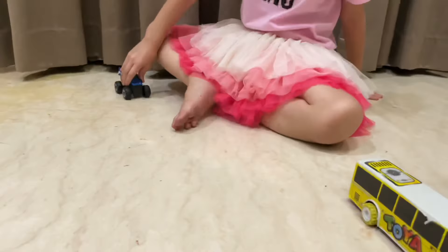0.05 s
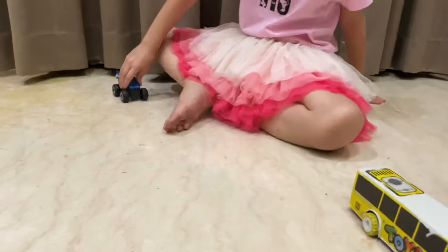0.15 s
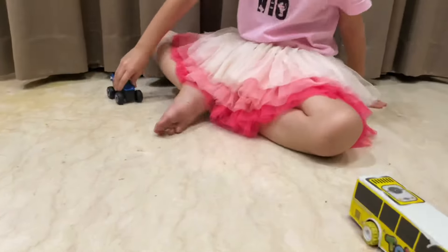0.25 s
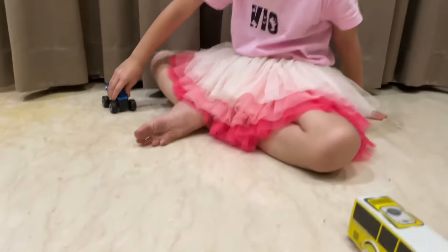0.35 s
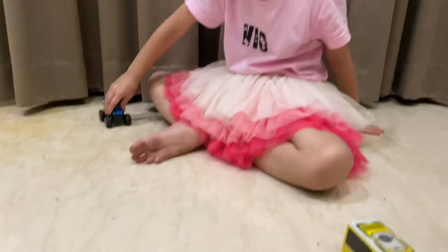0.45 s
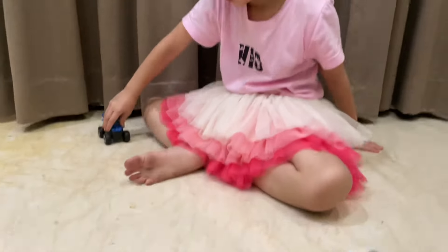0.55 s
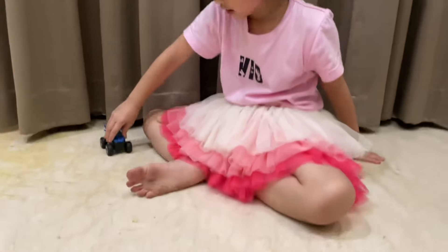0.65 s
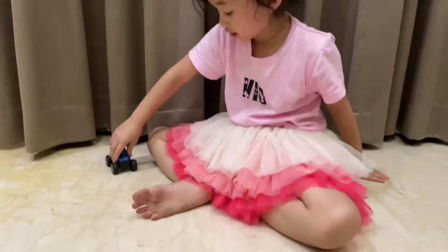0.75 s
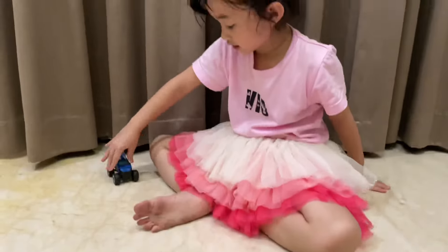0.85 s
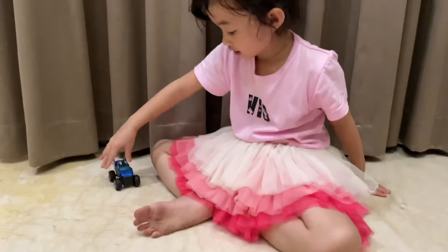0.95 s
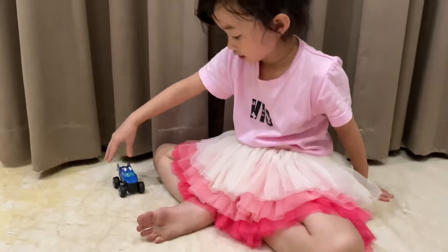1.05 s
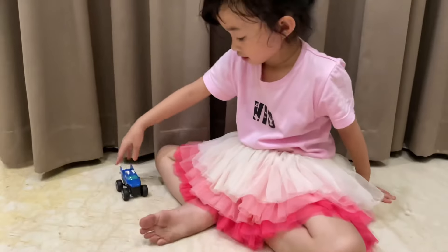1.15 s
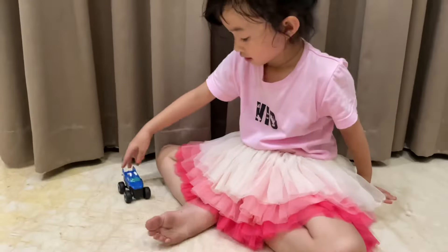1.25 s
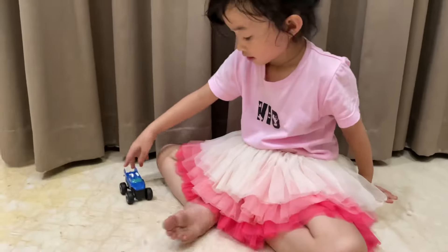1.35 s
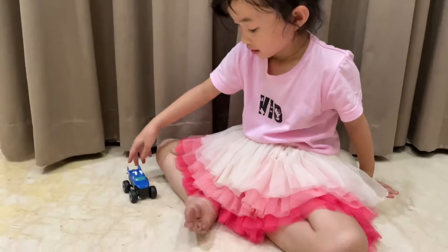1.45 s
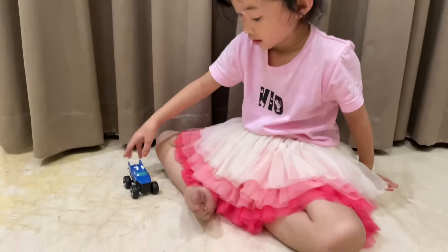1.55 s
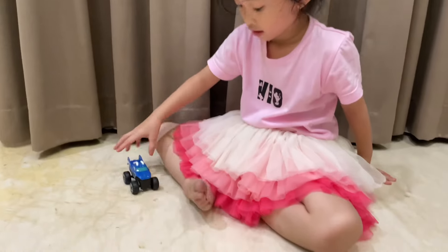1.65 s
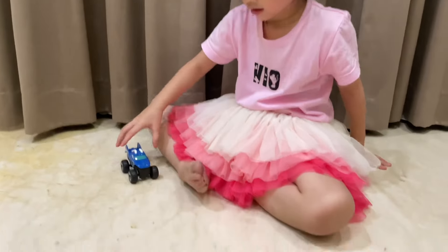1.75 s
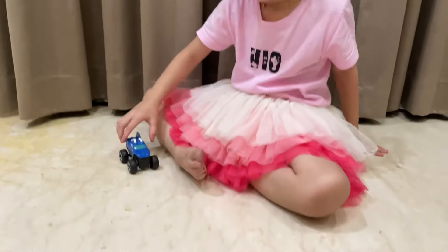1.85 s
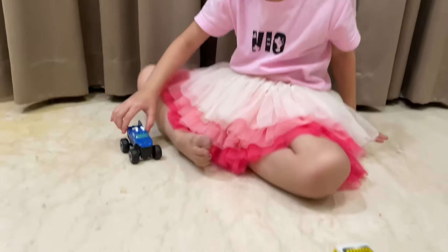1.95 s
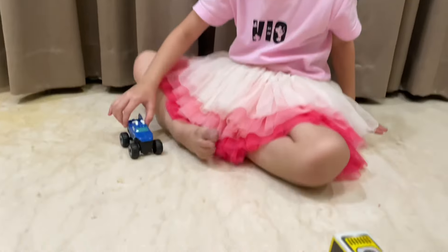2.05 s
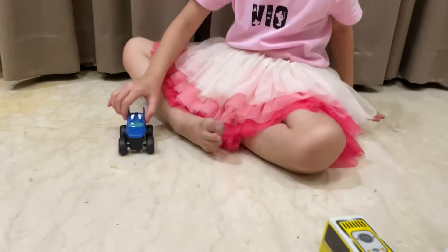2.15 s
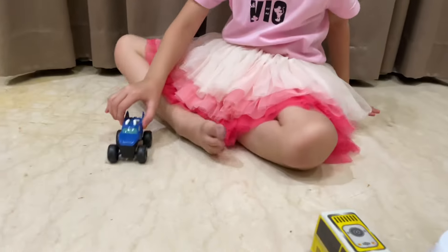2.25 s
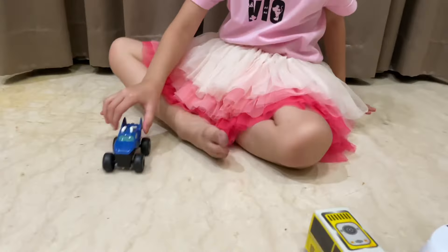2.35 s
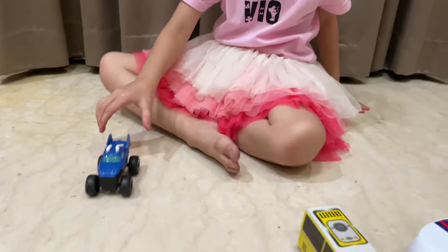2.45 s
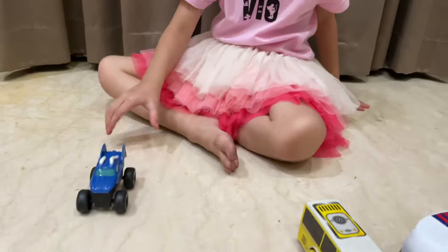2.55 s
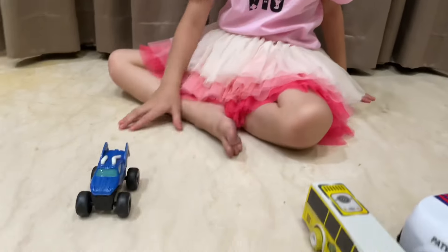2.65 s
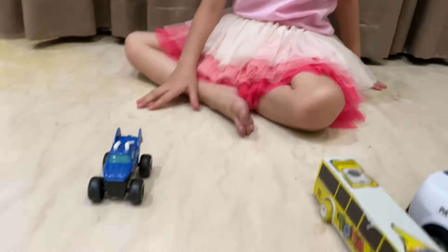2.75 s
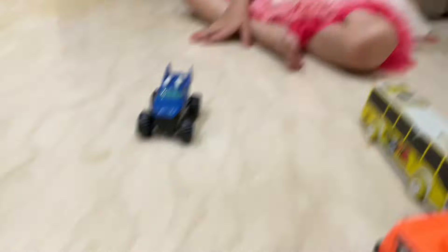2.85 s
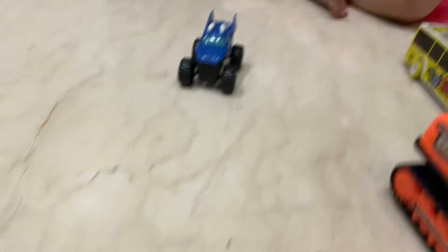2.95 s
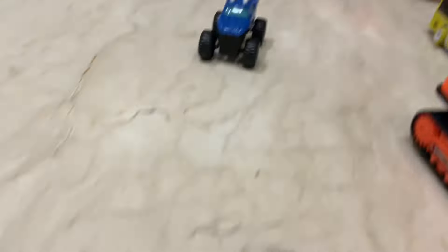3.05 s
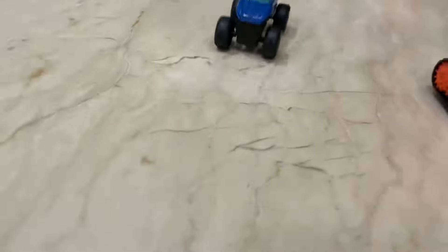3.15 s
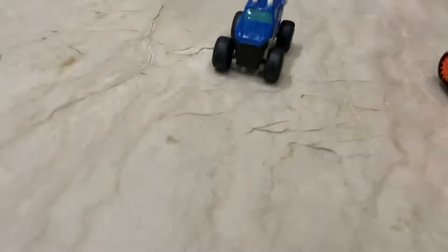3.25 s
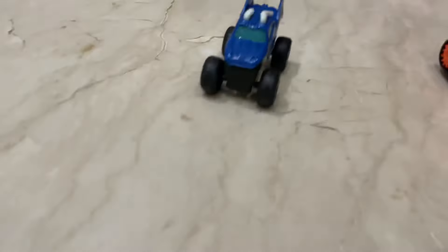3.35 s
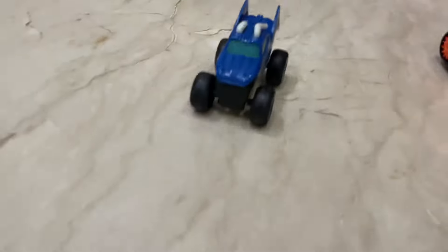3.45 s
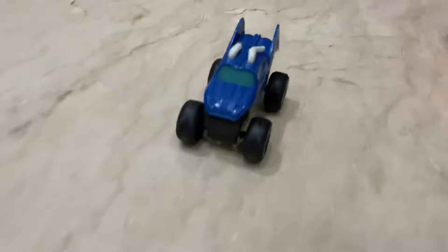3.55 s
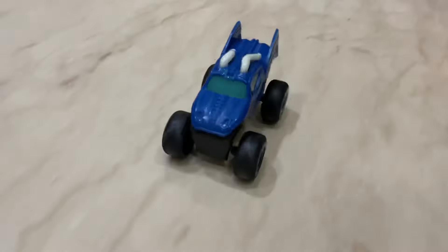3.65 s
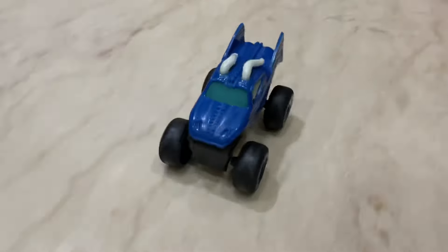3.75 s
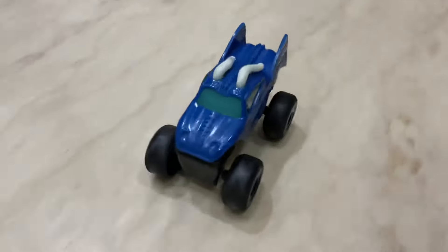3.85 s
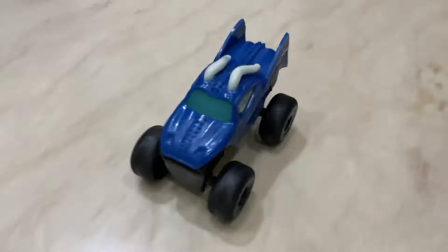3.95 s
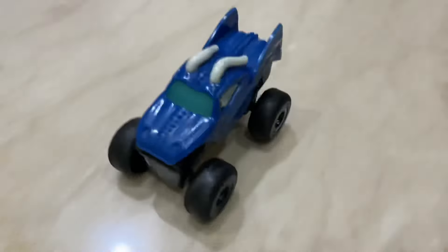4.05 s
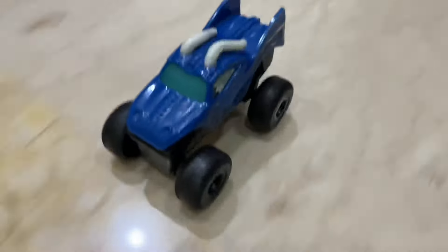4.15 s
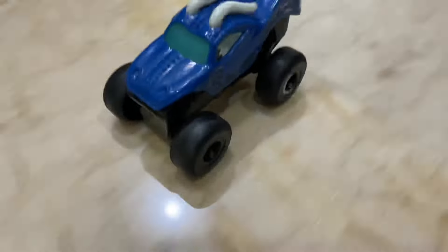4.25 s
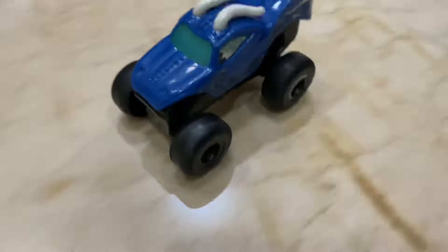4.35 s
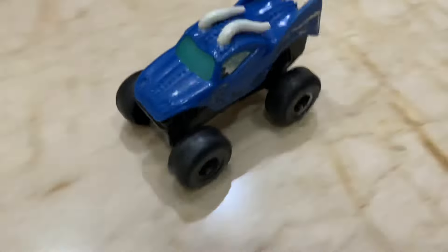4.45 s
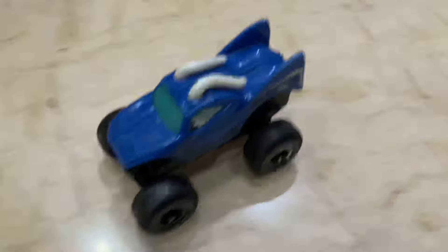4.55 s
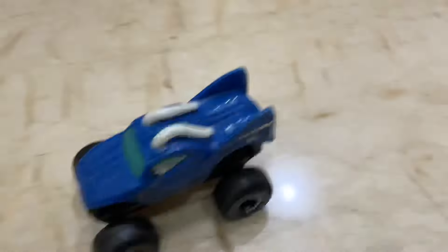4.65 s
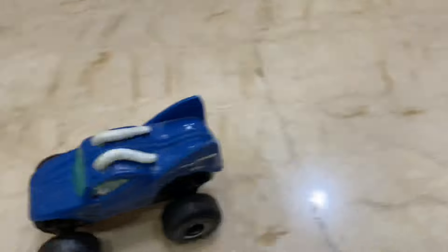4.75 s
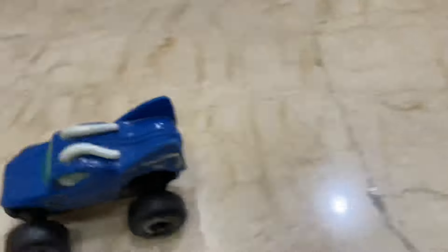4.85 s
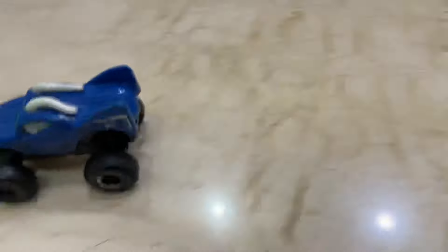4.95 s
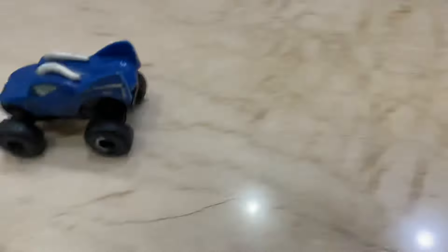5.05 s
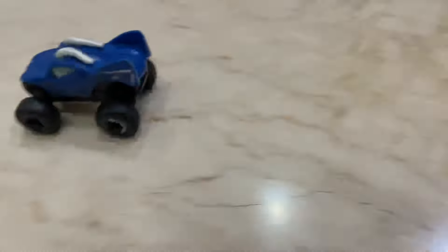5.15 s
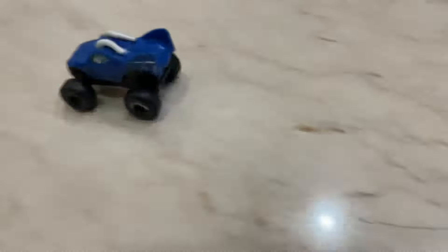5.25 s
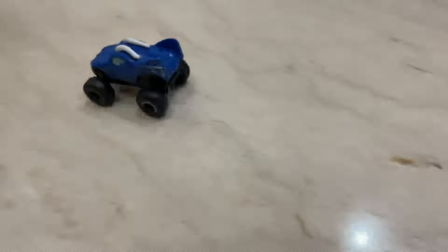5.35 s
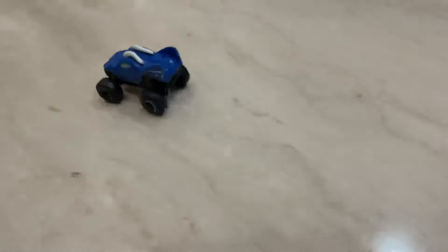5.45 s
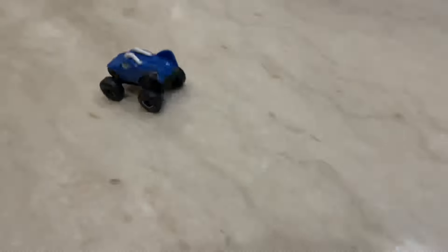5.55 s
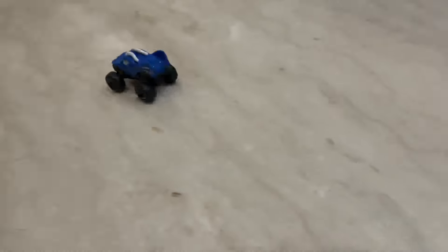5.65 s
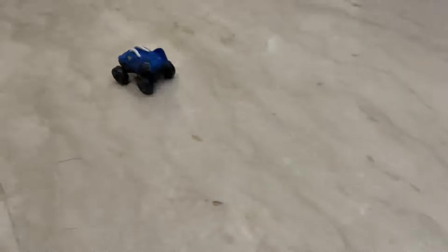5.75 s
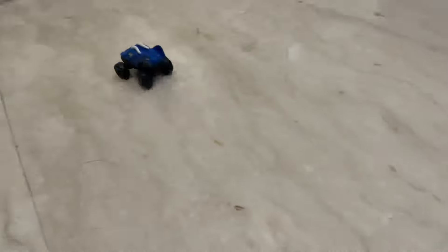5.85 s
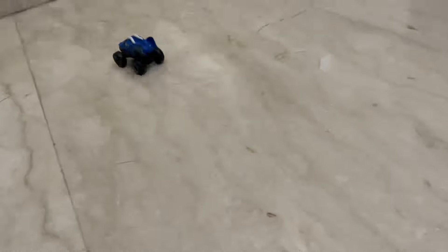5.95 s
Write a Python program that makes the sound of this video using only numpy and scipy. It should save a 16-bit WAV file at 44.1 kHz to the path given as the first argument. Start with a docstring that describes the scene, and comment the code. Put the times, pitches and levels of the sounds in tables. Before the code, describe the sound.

A plastic toy truck is nudged in short ratcheting clicks, something knocks once, then its gears whir and rattle loudly across a stone floor.

```python
"""A plastic toy truck with a gear motor is shoved by hand in short clicking bursts on an indoor stone floor.
Something farther off knocks once, with quick rebounds; then the truck is eased forward and let go.
Gear teeth rattle its hollow shell, blows ring its steel axle, and loose parts chatter as the tyres roll.
An appliance hums throughout over low room air. Noise pulses drive resonances; a stereo pair hears it
with a time lead that follows the truck, among changing reflections."""
import sys
import numpy as np
from scipy import signal
from scipy.fft import rfft, irfft
from scipy.io import wavfile
from scipy.ndimage import uniform_filter1d, minimum_filter1d

SR = 44100
rng = np.random.default_rng(int(sys.argv[2]) if len(sys.argv) > 2 else 0)


def pcm_store(signal):
    """Save signal as 16-bit PCM."""
    levels = np.round(np.clip(np.atleast_2d(signal), -1, 1) * 32767)
    wavfile.write(sys.argv[1], SR, levels.astype(np.int16).T)


N = 265041
TIME = np.arange(N) / SR
HZ = np.fft.rfftfreq(N, 1 / SR)

# the hardest blows on the shell: start_s, relative_db
SHELL_BLOWS = [(1.924, -9), (2.136, -8), (2.1455, -6), (2.829, -6), (3.0094, -4), (3.0217, -6), (3.044, -4),
               (3.1518, -5), (3.2066, -6), (3.261, -3), (3.284, -4), (3.292, -2), (3.3238, -5),
               (3.4359, -5), (3.456, -2), (3.5843, -6), (3.692, -5), (3.7071, -6), (3.8406, -5),
               (3.8605, -6), (3.9003, -5), (3.9194, -4), (4.0352, -4), (4.0685, -5), (4.1041, -2),
               (4.1486, -5), (4.2308, -4), (4.2647, -5), (4.3126, -5), (4.3306, -4), (4.3451, -4),
               (4.3829, -5), (4.4812, -2), (4.5143, -4), (4.5795, -4), (4.7858, -5), (4.8111, -6),
               (4.8596, -6), (5.1998, -6), (5.3772, -3), (5.425, -4), (5.5821, -6), (5.603, -4),
               (5.6544, -5), (5.8338, -7), (5.8756, -7), (5.9534, -7)]
# the hardest blows on the axle: start_s, relative_db
AXLE_BLOWS = [(1.8532, -20), (2.1244, -19), (2.2598, -14), (2.379, -12), (2.4374, -8), (2.4562, -10),
              (2.4865, -9), (2.5034, -7), (2.6115, -14), (2.6564, -9), (2.6999, -12), (2.7164, -11),
              (2.7307, -11), (2.774, -10), (2.7931, -11), (3.099, -13), (3.1833, -13), (3.2755, -11),
              (3.3086, -9), (3.3273, -10), (3.3503, -6), (3.3606, -6), (3.3755, -8), (3.3947, -6),
              (3.5333, -7), (3.5802, -11), (3.5924, -9), (3.6006, -6), (3.6536, -11), (3.7775, -11),
              (3.791, -10), (4.0913, -8), (4.1141, -10), (4.1356, -11), (4.7316, -15), (4.7711, -13),
              (4.8284, -7), (4.8466, -10), (4.8747, -10), (4.8968, -7), (4.9081, -10), (4.9632, -8),
              (5.1514, -13), (5.3531, -12), (5.8671, -9)]
# the sharpest plastic ticks: start_s, relative_db
PLASTIC_TICKS = [(0.012, -24), (0.028, -21), (0.268, -25), (2.1253, -15), (2.2158, -14), (2.2497, -12),
                 (2.3777, -15), (2.715, -13), (3.099, -16), (3.1823, -15), (3.2906, -15), (3.4387, -13),
                 (3.5694, -14), (3.8553, -13), (3.9306, -12), (3.964, -14), (4.0454, -12), (4.0696, -13),
                 (4.189, -12), (4.3113, -15), (4.3408, -13), (4.4115, -14), (4.4866, -12), (4.5521, -13),
                 (4.628, -12), (4.658, -12), (4.6875, -12), (4.7283, -13), (4.7435, -12), (4.7692, -12),
                 (5.3264, -13), (5.4157, -9), (5.4361, -9), (5.6537, -14), (5.751, -10), (5.9597, -13)]
# spectrum of a small plastic tick: frequency_hz, relative_db
TICK_SPECTRUM = [(300, -36), (2000, 7), (4000, 22), (5200, 12), (6500, 16), (8300, 2.5), (10700, 8),
                 (11800, 4), (13000, 5.5), (15500, -39)]


def amp(db):
    """Decibels to gain."""
    return 10 ** (np.asarray(db) / 20)


def unit(x):
    """Scales to an rms of one."""
    return x / np.sqrt(np.mean(x ** 2) + 1e-20)


def read(points, hz):
    """A spectrum joined by straight lines over log frequency."""
    f, value = np.transpose(points)
    return np.interp(np.log(hz + 1), np.log(f + 1), value)


def curve(rows, axis=1):
    """One column of a table at every sample."""
    rows = np.array(rows)
    return np.interp(TIME, rows[:, 0], rows[:, axis])


def level(rows):
    """Gain from a dB curve, with a short fade in where it starts."""
    started = 1. * (TIME >= rows[0][0])
    return uniform_filter1d(started, size=500) * amp(curve(rows))


def wander(rate_hz):
    """Smooth random drift of unit rms, mostly slower than the given rate."""
    noise = rfft(rng.standard_normal(N))
    return unit(irfft(noise / (1 + (HZ / rate_hz) ** 4), N))


def steadied(x, size=4000):
    """Holds the running rms near one and keeps the quick detail."""
    power = uniform_filter1d(uniform_filter1d(x ** 2, size), size)
    return x / np.sqrt(power.clip(0) + 1e-12)


def impacts(per_s, spread_db):
    """Random impulses of uneven size and sign."""
    size = amp(spread_db * np.clip(rng.standard_normal(N), -2, 2))
    return (rng.random(N) < per_s / SR) * size * rng.choice([-1, 1], N)


def blows(rows):
    """One impulse for each row (start_s, relative_db)."""
    s, db = np.transpose(rows)
    at = np.clip(np.round(s * SR).astype(int), 0, N - 1)
    return np.bincount(at, amp(db), N)


def strike(force, response):
    """A body's answer to a train of blows."""
    return signal.oaconvolve(force, response)[:N]


def bursts(rows, decay_s):
    """Each touch (start_s, relative_db) is a short, dying burst of noise."""
    fade = np.exp(-TIME[:SR // 50] / decay_s)
    return strike(blows(rows), fade / np.linalg.norm(fade)) * rng.standard_normal(N)


def snap(points, modes=(), size=2048):
    """A causal click of unit energy with the given spectrum, raised at its resonances."""
    hz = abs(np.fft.fftfreq(size, 1 / SR))
    peaks = 1 + sum(amp(db) ** 2 / (1 + (2 * (hz - centre) / width) ** 2) for centre, width, db in modes)
    log_gain = np.log(amp(read(points, hz)) * np.sqrt(peaks))
    # minimum phase puts the energy as early as the spectrum allows
    click = np.fft.ifft(np.exp(np.conj(signal.hilbert(log_gain)))).real
    return click / np.linalg.norm(click)


def ring(modes, size=2048):
    """Dying sines of unit energy in all; a wider resonance dies sooner."""
    t = TIME[:size]
    tone = sum(amp(db) * width * np.exp(-np.pi * width * t) * np.sin(2 * np.pi * hz * t)
               for hz, width, db in modes)
    return tone / np.linalg.norm(tone)


def dispersed(click, spread_s=0.002075, size=4096):
    """Bending waves cross the plastic faster in the treble, so a blow smears into a short chirp."""
    hz = np.fft.rfftfreq(size, 1 / SR)
    delay_s = spread_s / (1 + hz / 3000)
    phase = 2 * np.pi * np.cumsum(delay_s) * hz[1]
    return irfft(rfft(click, size) * np.exp(-1j * phase), size)


def bend(x, shift_hz):
    """Shifts all the frequencies of a sound up or down along a curve."""
    return (signal.hilbert(x) * np.exp(2j * np.pi * np.cumsum(shift_hz) / SR)).real


def background(hum_db=-2.5, beat_s=0.3, beat_at_s=0.23, air_db=-37):
    """An appliance hums, beats and changes in level, over the low rush of the room."""
    # main hum: start_s, relative_db
    hum_level = [(0, -31), (2.4, -32), (3.05, -34), (3.2, -46), (4.4, -48), (5.2, -39), (5.8, -32)]
    # higher lines: frequency_hz, level_db against the top of the hum_level table
    overtone_lines = [(98.5, -12), (145.3, -15.5), (199.5, -17)]
    # room air: frequency_hz, relative_db
    air_spectrum = [(20, -13), (32, -12), (45, -20), (62, 12.5), (85, 5), (130, 3.5), (250, -4), (450, -6),
                    (800, -15.5), (2000, -19.5), (5000, -33), (15500, -42)]
    hum_hz, waver_db = 48.3, 1.5

    def tone(hz):
        phase_waver = .5 * wander(5) * hz / 100  # radians
        return np.sqrt(2) * np.sin(2 * np.pi * (hz * TIME + rng.random()) + phase_waver)

    here_db = curve(hum_level)
    top_db = here_db.max()
    beat = 1 + .5 * np.cos(2 * np.pi * (TIME - beat_at_s) / beat_s)
    drone = amp(hum_db + here_db + waver_db * wander(3.8)) * beat * tone(hum_hz)
    # the higher lines and the air follow the hum's level changes only in part
    spot = amp(.3 * (here_db - top_db))
    overtones = spot * sum(amp(top_db + db) * tone(hz) for hz, db in overtone_lines)
    common, apart = rfft(rng.standard_normal((2, N))) * amp(read(air_spectrum, HZ))
    apart = apart * HZ / (HZ + 110)  # the bass stays alike on both sides
    air = spot * unit(irfft(np.array([common + apart, common - apart]), N))
    return (drone + overtones + amp(air_db) * air) * amp([[-.8], [.8]])


def shoves():
    """Each shove by hand swells, lasts a moment and runs down."""
    # short shoves: start_s, relative_db, run_down_db_per_s
    shove_rows = [(-0.025, -22, 125), (0.235, -25, 125), (0.39, -41, 120)]
    rise_s, hold_s = .028, .06
    total = 0
    for s, db, fall in shove_rows:
        swell = np.clip((TIME - s) / rise_s, 0, 1) ** 1.5
        total = total + swell * amp(db - fall * np.maximum(TIME - s - hold_s, 0))
    return total


def drive(shove_db=0):
    """The loudness of the gears, as a gain, in the shoves and the long run."""
    # the long run, eased forward by hand and then let go: start_s, relative_db
    run_level = [(1.17, -45), (1.41, -42), (1.47, -33), (1.55, -42), (1.64, -43), (1.69, -33), (1.87, -29),
                 (1.98, -29.5), (2.15, -22), (2.18, -25), (2.23, -22), (2.29, -25), (2.46, -22),
                 (2.57, -28.5), (2.69, -23), (2.87, -22), (3.3, -21.5), (4.0, -18.5), (4.47, -17.5),
                 (4.7, -20), (5.08, -20), (5.23, -23.5), (5.39, -18.5), (5.93, -20), (6.01, -21)]
    return amp(shove_db) * shoves() + amp(3.5) * level(run_level)


def effort():
    """How hard the gears are driven, in dB against full speed."""
    full_db = -18.5
    # the shoves happen farther off, so they are harder than they sound
    driven = drive(shove_db=6)
    return np.maximum(20 * np.log10(driven + 1e-6) - full_db, -30)


def freedom():
    """The hand damps loose parts until the truck rolls away: 0 held, 1 rolling free."""
    held_s, free_s = 1.7, 3.5
    return np.clip((TIME - held_s) / (free_s - held_s), 0, 1)


def judder():
    """The chassis rocks in dying jolts; it hops before each hard landing, and the rattle lets up."""
    rock_hz, rock_jitter = 62, .4
    hop_s, hop_depth = .014, 2.0
    turns = np.cumsum(rock_hz * np.exp(rock_jitter * wander(rock_hz))) / SR
    jolts = unit(.5 - turns % 1)
    landings = blows([(s, 0) for s, _ in SHELL_BLOWS + AXLE_BLOWS + PLASTIC_TICKS])
    # run backwards, so that each hop leads up to its landing
    hop = strike(landings[::-1], signal.windows.tukey(round(hop_s * SR)))[::-1]
    rocking = .7 * (jolts + wander(rock_hz))
    return 1.5 * np.tanh(rocking - hop_depth * np.minimum(hop, 1))


def shell(shake, speed_up=.3, jitter=.45, uneven_db=3, rattle_db=-1.0, hand_db=-2, dulling=0.64):
    """Gear teeth hammer the plastic shell, faster and brighter the harder driven; a hand damps its ring."""
    # resonances: frequency_hz, width_hz, level_db against the broad spectrum
    shell_modes = [(1485, 71, 17.27), (1936, 190, 7.74), (2350, 110, 1.1)]
    # broad spectrum of a blow: frequency_hz, relative_db
    shell_spectrum = [(100, -67), (250, -14), (400, -19), (700, -10.5), (1100, -4.5), (1700, 0),
                      (2500, 4.5), (3100, 1), (3600, -10), (4800, 0), (6300, -9), (8300, -37), (10500, -18),
                      (12500, -21.5), (15500, -17)]
    # upper band, strongest while the nose points at the listener: start_s, change_db
    upper_band = [(.4, -6), (1.3, -10.5), (1.6, -7), (1.9, 3.5), (2.45, 4.5), (3.25, 5), (3.8, -2.5),
                  (4.8, 1), (5.4, -1), (6, 2.5)]
    upper_hz, upper_width_hz = 2790, 320
    teeth_hz = 195  # mean pace at full speed, before jitter
    stray_db, mesh_db, judder_db = -9, -19, 3.8  # stray knocks and mesh hiss, against the teeth
    clack_db, ping_shell_db = 11, 11.5
    rebound_db, rebound_s = 3, .007
    flex_hz, flex_rate_hz = 26, 22

    effort_db = effort()
    pace = teeth_hz * amp(speed_up * effort_db) * np.exp(jitter * wander(150))
    passed = np.floor(np.cumsum(pace) / SR)
    size = amp(uneven_db * rng.standard_normal(N).clip(-2, 2)) * rng.choice([-1, 1], N)
    teeth = np.diff(passed, prepend=0) * size
    stray = unit(impacts(per_s=900, spread_db=1.5))
    force = steadied(teeth) + amp(stray_db) * stray + amp(mesh_db) * rng.standard_normal(N)
    force = force * amp(judder_db * shake)

    free = dispersed(snap(shell_spectrum, shell_modes))
    damped_modes = [(hz, width, db + hand_db) for hz, width, db in shell_modes]
    held = dispersed(snap(shell_spectrum, damped_modes))
    rattle = strike(force * freedom(), free) + strike(force * (1 - freedom()), held)
    rattle = steadied(rattle, size=5000)
    treble = irfft(rfft(rattle) / (1 + (3300 / (HZ + 1)) ** 8), N)
    upper = irfft(rfft(rattle) * np.exp(-((HZ - upper_hz) / upper_width_hz) ** 2), N)
    brighter = (amp(dulling * effort_db) - 1) * treble
    rattle = rattle + brighter + (amp(curve(upper_band)) - 1) * upper

    # a hard blow is followed by a short buzz of rebounds; blows on the axle shake the shell too
    clacks = blows(SHELL_BLOWS) + amp(rebound_db) * bursts(SHELL_BLOWS, rebound_s)
    hard = amp(clack_db) * clacks + amp(ping_shell_db) * blows(AXLE_BLOWS)
    sound = amp(rattle_db) * drive() * rattle + strike(hard, free)
    # the shell flexes, so its resonances waver
    return bend(sound, flex_hz * wander(flex_rate_hz))


def axle(shake, chatter_db=0.0, shove_db=-17, swell_hz=300, held_sharp_hz=85):
    """The steel axle chatters and rings at blows, sharper while held; it wavers as it shifts in its seat."""
    # resonances: frequency_hz, width_hz, relative_db
    axle_modes = [(5277, 127, 8.5), (9545, 68, -12), (10980, 120, -15.5), (13800, 560, -33),
                  (15000, 520, -20)]
    # chatter on the long run: start_s, relative_db
    axle_level = [(1.31, -57.5), (1.48, -42.5), (1.62, -59), (1.7, -39.5), (1.85, -39), (1.96, -47),
                  (2.13, -29.5), (2.33, -30), (2.48, -27), (2.58, -24), (2.8, -23.5), (2.92, -22),
                  (3.0, -17), (3.2, -24), (3.45, -17), (3.65, -12), (3.73, -21), (3.82, -16), (4.22, -20),
                  (4.62, -27.5), (4.88, -20.5), (5.1, -28), (5.22, -25), (5.42, -16), (6.01, -15.5)]
    judder_db, ping_db, waver_hz = 4.2, 21, 32
    tone = ring(axle_modes)
    # the ring swells briefly before it dies
    tone = tone * (1 - np.exp(-np.pi * swell_hz * TIME[:len(tone)]))
    tone = tone / np.linalg.norm(tone)
    taps = impacts(per_s=380, spread_db=2.0) * amp(judder_db * shake)
    chatter = steadied(strike(taps, tone), size=4000)
    loudness = amp(shove_db) * shoves() + amp(chatter_db) * level(axle_level)
    steel = loudness * chatter + amp(ping_db) * strike(blows(AXLE_BLOWS), tone)
    shift_hz = held_sharp_hz * (1 - freedom()) + waver_hz * wander(58.9)
    return bend(steel, shift_hz)


def grit(grit_db=-5):
    """A shove grinds the tyres over fine grit: sparse, very uneven grains."""
    # spectrum of a grain: frequency_hz, relative_db
    grit_spectrum = [(150, 6), (450, -13), (660, 3), (850, -11), (1150, 5), (2000, -16), (3200, 6.5),
                     (4500, -5), (7000, -20), (15500, -57)]
    grains = strike(impacts(per_s=260, spread_db=9.0), snap(grit_spectrum))
    return amp(grit_db) * shoves() * steadied(grains)


def nudge(start, length, per_s, db, crest):
    """Evenly spaced teeth that grow louder and then softer: rows (start_s, relative_db)."""
    swell_db, uneven_db = 21, 1.5
    t = np.arange(0, length, 1 / per_s)
    chance = rng.standard_normal(size=64)[:len(t)]
    tooth_db = db - swell_db * abs(t / length - crest) + uneven_db * chance
    return np.transpose([start + t, tooth_db])


def clicks(tooth_db=10, tooth_s=0.0009, lone_db=10):
    """Teeth snap over in runs or singly, and loose parts tick."""
    # pushes by hand: start_s, length_s, teeth_per_s, relative_db, crest_share (of the length)
    nudge_rows = [(0.012, 0.16, 66, -16, 0.02), (0.228, 0.14, 72, -19, 0.33),
                  (0.6375, 0.098, 178, -13, 0.84), (0.796, 0.03, 122, -27, 0.5),
                  (1.1605, 0.12, 79, -25, 0.022)]
    # single teeth that slip as the truck stands almost still: start_s, relative_db
    lone_teeth = [(.5438, -19), (.5578, -17.5), (.5768, -28), (.6075, -32), (1.1605, -26)]
    # spectra of a tooth in a run and of a single one: frequency_hz, relative_db
    tooth_spectrum = [(200, -42), (700, -21.5), (1500, -10), (2500, -16.5), (4000, -16), (6500, -22.5),
                      (9000, -30), (12000, -28), (15500, -54)]
    lone_spectrum = [(200, -16), (800, 5), (2000, -3), (6000, -3.5), (10000, -12), (15500, -25)]
    tick_db, tick_s = 18, .0024
    teeth = np.vstack([nudge(*row) for row in nudge_rows])
    runs = strike(bursts(teeth, tooth_s), snap(tooth_spectrum))
    lone = strike(blows(lone_teeth), snap(lone_spectrum))
    ticks = strike(bursts(PLASTIC_TICKS, tick_s), snap(TICK_SPECTRUM))
    return amp(tooth_db) * runs + amp(lone_db) * lone + amp(tick_db) * ticks


def tyres(low_cut_hz=250, roll_db=-1, shove_db=-9, scuff_db=-1):
    """Bumps of the floor drum through a wandering resonance; held tyres scuff in fine grains."""
    # scuffs while a hand holds the truck: peak_s, relative_db, swell_and_fade_s
    scuff_rows = [(0.02, -48, 0.022), (0.27, -49, 0.032), (0.54, -46, 0.16), (0.715, -51, 0.01),
                  (1.449, -34.5, 0.017), (1.7, -37, 0.018), (2.0, -31, 0.083), (2.081, -22, 0.011),
                  (2.21, -27, 0.024), (2.255, -13, 0.026)]
    # hollow rolling on the long run: start_s, relative_db, centre_hz
    roll_rows = [(1.13, -46.5, 650), (1.7, -38.5, 740), (1.75, -36, 657), (2.18, -31.5, 930),
                 (2.77, -27.5, 886), (2.98, -24.5, 650), (3.12, -33.5, 714), (3.46, -30, 800),
                 (3.56, -25, 420), (3.6, -29, 500), (3.84, -25, 380), (4.18, -31.5, 620), (4.4, -25.5, 840),
                 (4.77, -37.5, 820), (5.11, -25.5, 764), (5.54, -25, 816), (6.01, -42, 760)]
    # spectrum of a scuffing grain: frequency_hz, relative_db
    tyre_spectrum = [(300, -70), (1500, -21), (4000, 35), (6000, 14), (7700, 25), (10000, 27),
                     (13000, 26.5), (15500, 21)]
    roll_width_hz = 440
    low_cut = signal.butter(3, low_cut_hz, "high", fs=SR, output="sos")
    bumps = signal.sosfilt(low_cut, impacts(per_s=1200, spread_db=1.5))
    # turn the moving centre down to 0 Hz, resonate there, and turn it back up
    turn = np.exp(2j * np.pi * np.cumsum(curve(roll_rows, axis=2)) / SR)
    r = np.exp(-np.pi * roll_width_hz / SR)
    hollow = (turn * signal.lfilter([1], [1, -2 * r, r * r], bumps / turn)).real
    rolling = amp(roll_db) * level(roll_rows) + amp(shove_db) * shoves()
    grains = strike(impacts(per_s=3000, spread_db=5.0), snap(tyre_spectrum))
    slipping = sum(amp(db) * np.exp(-abs(TIME - s) / fade_s) for s, db, fade_s in scuff_rows)
    return rolling * steadied(hollow) + amp(scuff_db) * slipping * steadied(grains)


def knock(crack_db=4.5, contact_s=0.0038):
    """A hard object set down some way off: dense bursts of contacts, the first of which leaves it ringing."""
    # the knock and its rebounds: start_s, relative_db
    knock_rows = [(.9022, 3.5), (.9065, -3), (.9255, -1.5)]
    # resonances: frequency_hz, width_hz, relative_db
    knock_modes = [(350, 60, 8), (484, 25, 5), (848, 15, 11), (1130, 80, 11), (1351, 16, 18),
                   (1525, 20, 16), (1900, 250, 12), (4150, 8, 17), (4234, 7, 25.5), (4272, 9, 25),
                   (4370, 10, 20)]
    # spectrum of the crack: frequency_hz, relative_db
    knock_spectrum = [(100, -22), (320, 1.5), (900, 6), (2100, 6.5), (3200, -3), (4250, -7), (4900, -14),
                      (6200, -15), (9000, -24), (15000, -19)]
    ring_db = -.5
    contacts = np.exp(-TIME[:SR // 40] / contact_s) * rng.standard_normal(SR // 40)
    contacts = contacts / np.linalg.norm(contacts)
    crack = strike(strike(blows(knock_rows), contacts), snap(knock_spectrum))
    ringing = strike(blows(knock_rows[:1]), ring(knock_modes, size=14000))
    return amp(crack_db) * crack + amp(ring_db) * ringing


def loose_parts(shake):
    """Small plastic parts chatter at random while the gears run: dying noise bursts, shaken by the judder."""
    # chatter against the gears: start_s, relative_db
    parts_level = [(1.7, -25), (2.3, -9.5), (3.7, -12), (4.3, -9.5), (4.65, -8.5), (4.9, -11), (5.35, -7.5),
                   (6, -7.5)]
    judder_db = 5.2
    burst = np.exp(-TIME[:SR // 50] / .002)
    hits = abs(impacts(per_s=300, spread_db=4.5)) * amp(judder_db * shake)
    envelope = strike(hits, burst)
    ticks = steadied(strike(envelope * rng.standard_normal(N), snap(TICK_SPECTRUM)))
    return level(parts_level) * drive() * ticks


def room(x, size=256, onset_s=0.00025, alike_hz=350):
    """Sparse reflections, dying sooner in the treble and alike at both microphones in the bass."""
    # time to die by 60 dB: frequency_hz, decay_s
    decay_times = [(150, 0.28), (1000, 0.27), (4000, 0.23), (8000, 0.13), (15000, 0.004)]
    taps = rng.standard_normal((2, SR)) * (rng.random((2, SR)) < .08)
    taps = taps * (1 - np.exp(-TIME[:SR] / onset_s))
    hz, t, z = signal.stft(taps, SR, nperseg=size)
    alike = 1 / (1 + (hz[:, None] / alike_hz) ** 2)
    z = np.array([z[0], alike * z[0] + np.sqrt(1 - alike ** 2) * z[1]])
    decay = amp(-60 * t / read(decay_times, hz)[:, None])
    tail = signal.istft(z * decay, SR, nperseg=size)[1]
    tail = tail / np.linalg.norm(tail, axis=1, keepdims=True)
    return signal.fftconvolve(x[None], tail, axes=1)[:, :N]


def moving_room(x, count=5):
    """Reflection patterns cross-fade in turn, one cycle a second, as the truck moves."""
    place = (TIME * count)[None] - np.arange(count)[:, None]
    away = abs((place + count / 2) % count - count / 2)
    return sum(room(x * np.cos(np.pi / 2 * np.minimum(d, 1))) for d in away)


def microphones(x, size=512):
    """Direct sound reaches the left microphone first, by a lead that follows the truck."""
    # direction of the truck: start_s, left_degrees
    bearing = [(0, 19.5), (2.2, 17.4), (2.42, 25.2), (2.75, 24.6), (3.15, 3.1), (3.9, 17.5), (4.6, 19),
               (5.0, 31), (5.55, 16.3), (6, 18.3)]
    # fixed phase between the microphones in the treble: frequency_hz, left_lead_radians
    treble_phase = [(7500, 7.5), (8600, 10), (9700, 0.78), (11500, -0.5), (12800, 50.5), (13600, -3)]
    spacing_m, sound_m_per_s = .14, 343
    hz, t, z = signal.stft(x, SR, nperseg=size, noverlap=size - size // 4)
    hz = hz[:, None]
    angle = np.radians(np.interp(t, *np.transpose(bearing)))
    lead_s = spacing_m / sound_m_per_s * np.sin(angle)
    phase = np.where(hz < treble_phase[0][0], 2 * np.pi * hz * lead_s, read(treble_phase, hz))
    pair = [z, z * np.exp(-1j * phase)]
    return signal.istft(pair, SR, nperseg=size, noverlap=size - size // 4)[1][:, :N]


def scene(far_wet_db=-6, axle_wet_db=4, parts_wet_db=5, click_wet_db=-12, knock_wet_db=-6):
    """The truck, the knock and the hum in one room."""
    near_wet_db, knock_echo_s = -11.5, .01
    shake = judder()
    body = shell(shake) + tyres() + grit()
    steel, parts = axle(shake), loose_parts(shake)
    snaps, far = clicks(), knock()
    # the truck comes up to the listener, so its reflections grow weaker
    wet_db = np.interp(TIME, [2, 3.2], [far_wet_db, near_wet_db])
    spread = amp(wet_db) * (body + amp(axle_wet_db) * steel + amp(parts_wet_db) * parts)
    far_walls = np.roll(far, round(knock_echo_s * SR))
    reflected = moving_room(spread + amp(click_wet_db) * snaps + amp(knock_wet_db) * far_walls)
    direct = microphones(body + steel + parts + snaps + far) * amp([[.2], [-.2]])
    return direct + reflected + background()


def record(dry):
    """A quick limiter turns down the highest peaks; then a low-pass ends the band."""
    headroom = np.minimum(1, .97 / (abs(dry).max(0) + 1e-9))
    gain = uniform_filter1d(minimum_filter1d(headroom, size=101), size=101)
    low_pass = signal.firwin(511, 15800, window=("kaiser", 9), fs=SR)  # cutoff in Hz
    return signal.oaconvolve(dry * gain, low_pass[None], "same", axes=1)


dry = scene()
out = record(dry)
pcm_store(out)
```